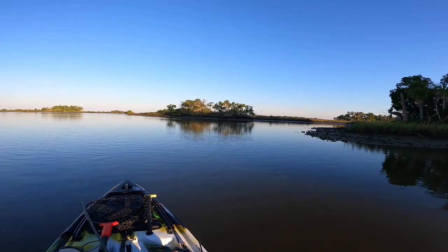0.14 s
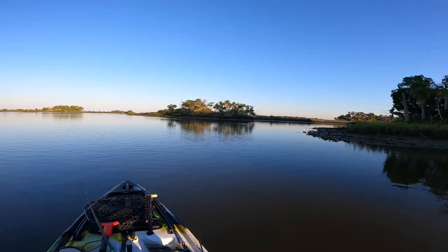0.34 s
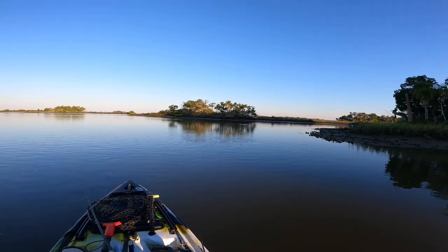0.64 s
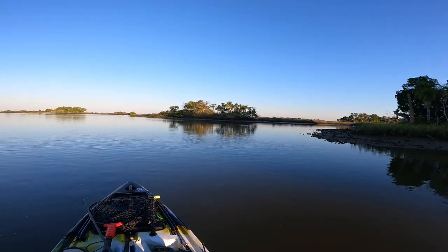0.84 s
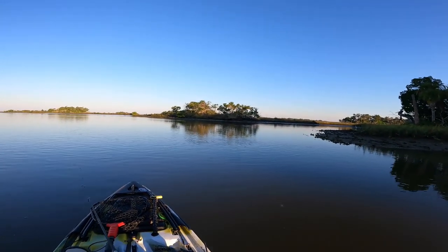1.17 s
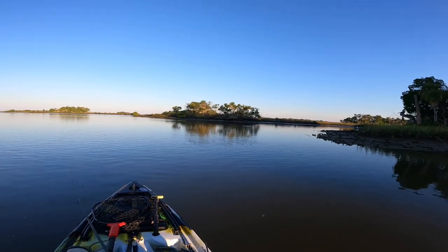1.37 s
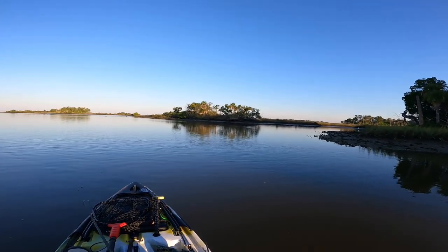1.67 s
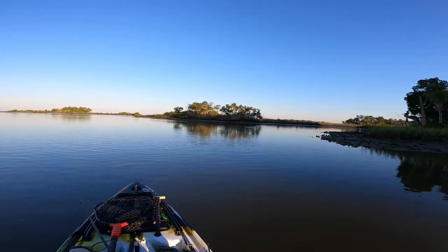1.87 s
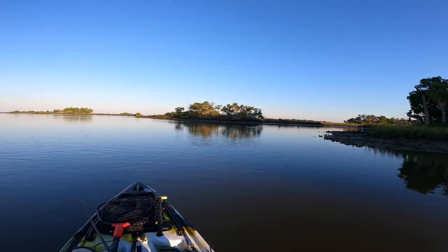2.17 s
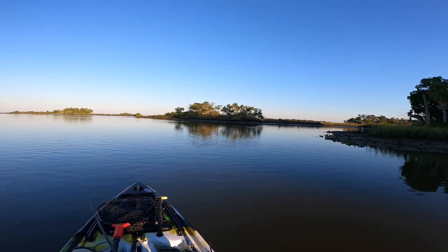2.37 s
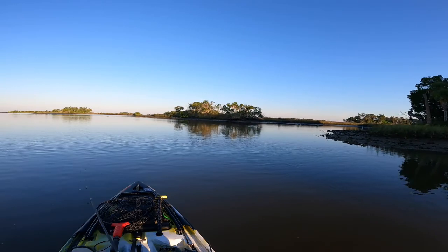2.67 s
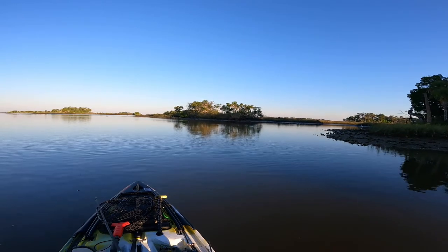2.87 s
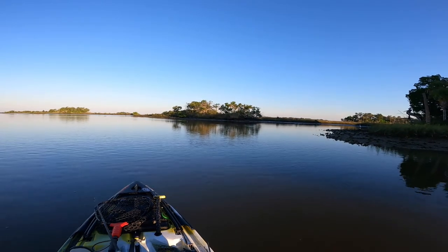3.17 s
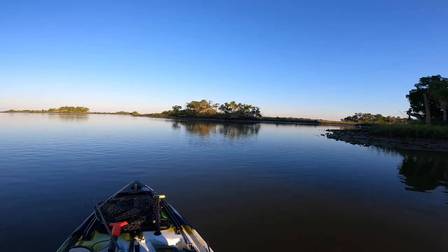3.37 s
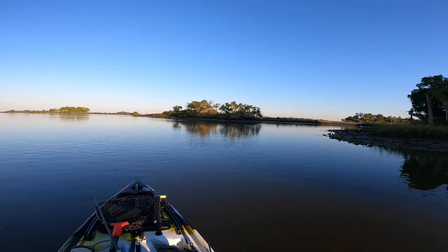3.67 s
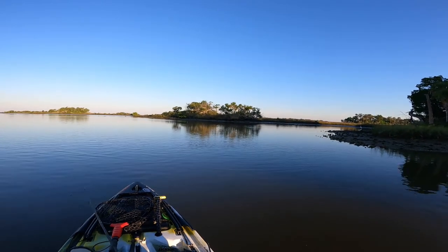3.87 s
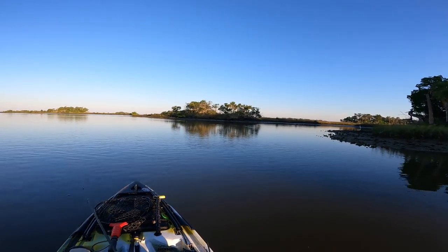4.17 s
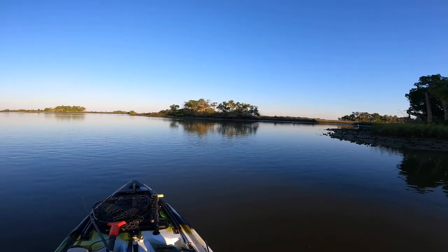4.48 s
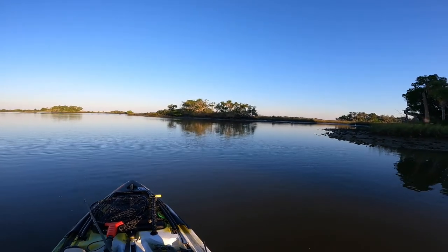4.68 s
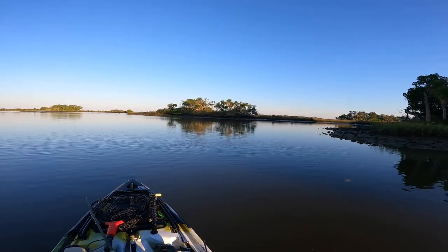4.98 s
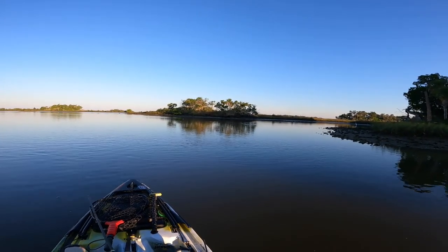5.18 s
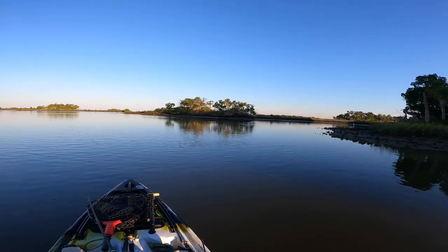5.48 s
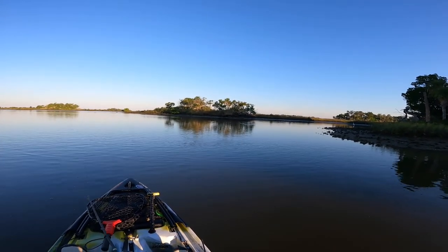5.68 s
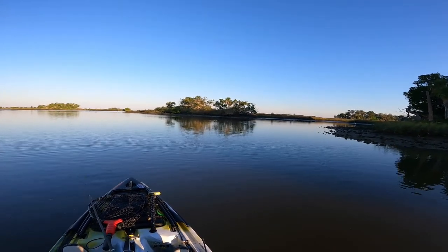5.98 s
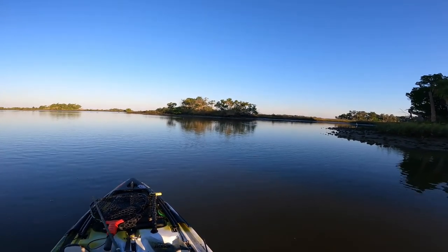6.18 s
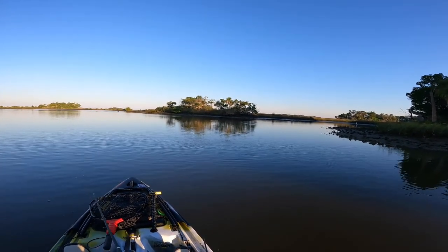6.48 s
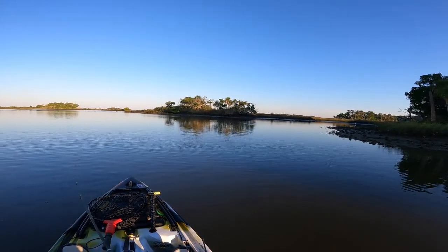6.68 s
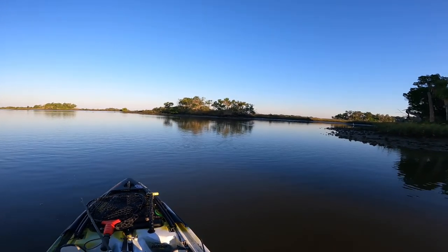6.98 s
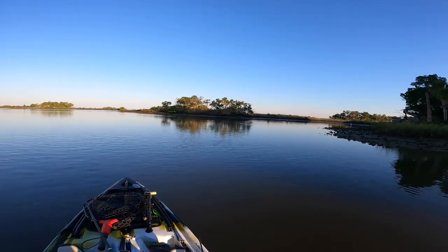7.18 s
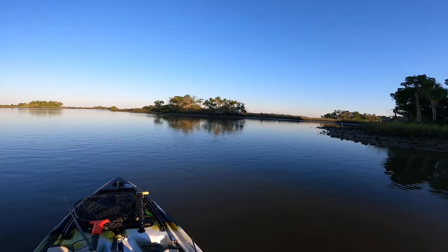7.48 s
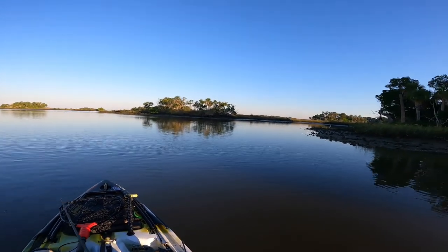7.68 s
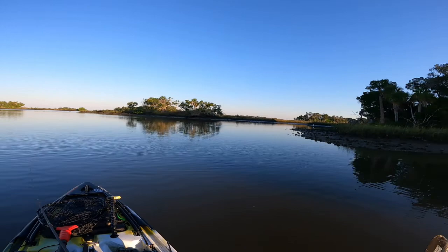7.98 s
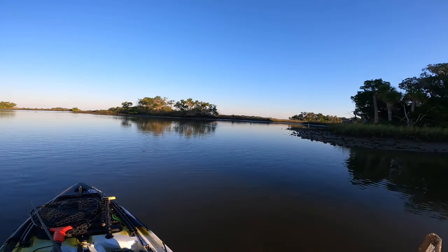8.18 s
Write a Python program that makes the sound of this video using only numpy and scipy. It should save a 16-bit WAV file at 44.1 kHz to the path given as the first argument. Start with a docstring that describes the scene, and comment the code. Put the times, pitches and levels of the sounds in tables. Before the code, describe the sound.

From 0 to about 8.3 seconds a distant airboat runs at nearly constant throttle: a strong low hum around 150 hertz, deep propeller thud and soft chopped roar beneath it, beating about once a second. Its overtones, growl and faint buzzing rasp swell and sink as if carried by moving air; one higher engine note sings out briefly around 4.5 seconds. Over it, very quietly, far insects make a narrow flickering trill near 4.4 kilohertz, slightly right, and thin high ticks recur roughly every 0.3 seconds in faint grainy hiss. At 0.56 a small, dry, hard tap sounds close by. From 2.75 to 4.05 a quick raspy rattle of sixteen strokes comes from the shore, growing duller midway and weaker later; a single drop plinks at 3.0. Afterwards only drone and insects continue, without the boat arriving or leaving. Open, calm, wide stereo, most different between sides in the treble.

```python
"""A distant airboat cruises at steady throttle, heard by a pair of microphones in a kayak on calm marsh water.
Its exhaust orders and blade tones are sines driven by one crankshaft, beating slowly against each other over
a roar of shaped noise; moving air fades the overtones in and out.
On the shore insects trill (narrow noise) and tick (a short high sine) in a faint hiss (noise); something small
gives one dry rattle (noise strokes), a hard thing is tapped (decaying sines) and a drop lands (a short sine)."""
import sys
import numpy as np
from scipy import signal
from scipy.fft import rfft, irfft
from scipy.io import wavfile
from scipy.ndimage import uniform_filter1d

SR = 44100
rng = np.random.default_rng(int(sys.argv[2]) if len(sys.argv) > 2 else 0)


def generate_wav(sig):
    """Save sig (samples, or channels by samples) to the path in sys.argv[1] as 16-bit PCM at SR."""
    pcm = np.round(np.clip(np.atleast_2d(sig).T, -1, 1) * 32767).astype(np.int16)
    wavfile.write(sys.argv[1], SR, pcm)


N = 367794
STEP = 6
T = np.arange(N) / SR
T_LOW = np.arange(N // STEP + 1) * STEP / SR  # a coarser clock is enough for the engine lines


def amp(db):
    """Decibels to gain."""
    return 10 ** (np.asarray(db) / 20)


def unit(x):
    """Scales to rms 1."""
    return x / np.sqrt(np.mean(abs(x) ** 2) + 1e-30)


def at_hz(points, hz):
    """Reads a spectrum on a log-frequency axis."""
    f, value = np.transpose(points)
    return np.interp(np.log(hz + 1), np.log(f), value)


def at_time(rows, t):
    """Reads a curve of (t/s, value) rows."""
    return np.interp(t, *np.transpose(rows))


def drift(size, rate, clock):
    """Slow complex chance of rms 1 that changes about rate times a second."""
    points = 1024
    hz = np.fft.fftfreq(points, clock[-1] / (points - 1))
    white = rng.standard_normal(points) + 1j * rng.standard_normal(points)
    slow = np.fft.ifft(np.fft.fft(white) / (1 + (hz / rate) ** 2))
    return np.interp(np.linspace(0, points - 1, size), np.arange(points), unit(slow))


# how much the two microphones differ: f/Hz, side level/dB re mid
MICROPHONES_APART = [(25, -21), (70, -37), (150, -35.5), (300, -28.5), (700, -16.5), (1400, -11.5),
                     (2800, -3.5), (4400, -7), (9000, -3.5), (14000, -14.5)]


def pair(common, apart):
    """Two microphones: they share the bass and differ more in the treble."""
    side_gain = amp(at_hz(MICROPHONES_APART, np.fft.rfftfreq(N, 1 / SR)))
    side = irfft(rfft(apart) * side_gain, N)
    return np.array([common + side, common - side])


def noise(colour):
    """Stereo noise with the given spectrum, mid and side source each of rms 1; steep fall above the last point."""
    hz = np.fft.rfftfreq(N, 1 / SR)
    shape = amp(at_hz(colour, hz)) / np.maximum(hz / colour[-1][0], 1) ** 4
    common, apart = unit(irfft(rfft(rng.standard_normal((2, N))) * shape, N))
    return pair(common, apart)


def far_line(turns, hz, steady_hz=800, flutter_hz=0.73, scatter=0.45, scatter_hz=7):
    """One partial after a long path: the higher it is, the more the air makes it twinkle."""
    loose = hz ** 2 / (hz ** 2 + steady_hz ** 2)  # share of the power that fades
    slow = drift(len(turns), flutter_hz, T_LOW)
    quick = drift(len(turns), scatter_hz, T_LOW)
    fading = unit(slow + scatter * quick)
    carried = unit(np.sqrt(1 - loose) + np.sqrt(loose) * fading)
    return np.sqrt(2) * (carried * np.exp(2j * np.pi * (turns + rng.random()))).real


# engine speed of the far boat: t/s, crankshaft turns per second
CRANK_SPEED = [(0.0, 59.37), (1.2, 59.29), (2.4, 59.1), (3.6, 59.0), (4.4, 59.01), (5.5, 59.17),
               (7.0, 59.23), (8.34, 59.25)]
# three blades behind a reduction gear: blade passes per crankshaft turn
BLADES_PER_TURN = 3 / 2.3808
# a moment when exhaust and propeller push together (s)
IN_STEP_S = 4.89
# firing note, before its waver: t/s, level/dB
FIRING_LEVEL = [(0, -27.5), (0.5, -33), (0.8, -29), (2.4, -27.5), (3.55, -29), (4.8, -26), (5.5, -27.5),
                (8.34, -27)]
# unequal cylinders fill in the orders of the four-stroke cycle: order, level/dB re EXHAUST_DB
EXHAUST_ORDERS = [(1, -37), (2, -22), (3, -12.5), (4, -24.5), (5, 0), (6, -23), (7, -22.5), (8, -15),
                  (9, -20), (10, -27), (11, -26), (12, -33), (13, -23.5), (14, -40.5), (15, -39),
                  (16, -23.5), (17, -39), (18, -40.5), (19, -33), (20, -34), (21, -34), (22, -34),
                  (23, -38), (24, -43.5), (25, -49.5), (26, -47), (27, -33.5), (28, -40), (29, -38.5)]
EXHAUST_DB, FIRING_ORDER = -30.5, 5
# one exhaust order sings out for a moment, then sinks: t/s, added level/dB
SINGING_RISE = [(3.6, 3.5), (4.45, 12.5), (5.2, 6)]
SINGING_ORDER = 11
# higher exhaust orders, a buzzing rasp: f/Hz, typical level/dB of each line
RASP_LINES = [(880, -74), (1080, -82.5), (1300, -76), (1550, -81), (1900, -83.5), (2150, -90), (2500, -96)]
# propeller tones: multiple of the blade rate, level/dB
BLADE_TONES = [(1, -36.5), (2, -39.5), (3, -51), (4, -61.5), (5, -53.5), (6, -67.5), (7, -70), (8, -65),
               (9, -65.5), (10, -71.5)]
# colour of the turbulent propeller wash: f/Hz, relative level/dB per Hz
ROAR_COLOUR = [(12, -23.5), (30, -13), (60, -2.5), (90, 1.5), (160, -1), (190, -5.5), (300, -9),
               (400, -8.5), (520, -16), (800, -19.5), (1050, -26.5), (1450, -28.5), (2000, -33.5),
               (2500, -48.5), (3400, -63)]
ROAR_DB = -42.5


def airboat(uneven_db=2.0, chop=.3, shimmer=0.049, waver_db=1.08, waver_hz=2.6):
    """Exhaust orders, blade tones and chopped roar, all driven by one crankshaft."""
    crank_hz = at_time(CRANK_SPEED, T_LOW)
    crank = np.cumsum(crank_hz) * STEP / SR
    crank = crank - np.interp(IN_STEP_S, T_LOW, crank)
    cycle, cycle_hz = crank / 2, crank_hz.mean() / 2  # a four-stroke cycle takes two turns
    blade, blade_hz = crank * BLADES_PER_TURN, crank_hz.mean() * BLADES_PER_TURN

    # the firing note and the second blade tone lie about 1 Hz apart: a slow throb
    firing_db = at_time(FIRING_LEVEL, T_LOW) + waver_db * drift(len(T_LOW), waver_hz, T_LOW).real
    hum = amp(firing_db) * np.cos(2 * np.pi * FIRING_ORDER * cycle)
    for k, db in BLADE_TONES[:2]:
        hum = hum + amp(db) * np.cos(2 * np.pi * round(k) * blade)
    hum = np.sqrt(2) * hum * (1 + shimmer * drift(len(hum), 5.0, T_LOW).real)

    # the other lines: phase in turns, mean frequency, level
    lines = []
    singing_db = at_time(SINGING_RISE, T_LOW)
    for k, db in EXHAUST_ORDERS:
        order = round(k)
        if order != FIRING_ORDER:
            line_db = EXHAUST_DB + db + singing_db * (order == SINGING_ORDER)
            lines.append((order * cycle, k * cycle_hz, line_db))
    for k in range(30, 84):
        line_db = at_hz(RASP_LINES, k * cycle_hz) + uneven_db * rng.standard_normal()
        lines.append((k * cycle, k * cycle_hz, line_db))
    for k, db in BLADE_TONES[2:]:
        lines.append((round(k) * blade, k * blade_hz, db))

    # two independently fading sums: one common to both microphones, one that sets them apart
    direct = sum(amp(db) * far_line(turns, hz) for turns, hz, db in lines)
    shore = sum(amp(db) * far_line(turns, hz) for turns, hz, db in lines)
    coarse = [hum + direct, shore]
    fine = signal.resample_poly(coarse, STEP, 1, axis=1, window=("kaiser", 11), padtype="antireflect")
    tones = pair(*fine[:, :N])

    # each passing blade chops the wash
    chopping = unit(1 + chop * np.cos(2 * np.pi * np.interp(T, T_LOW, blade)))
    return tones + amp(ROAR_DB) * noise(ROAR_COLOUR) * chopping


# swell of each register over the water, from low to high: t/s, level/dB (only its change about the mean counts)
THUD_SWELL = [(0.15, -36), (0.96, -33), (4.9, -37.5), (8.2, -35)]
DRONE_SWELL = [(0.1, -47.5), (1.38, -38), (3.26, -38), (5.63, -46), (7.63, -41), (8.2, -41)]
GROWL_SWELL = [(0.1, -52), (0.85, -52), (2.38, -57), (2.75, -52), (3.89, -47), (5.03, -55), (5.99, -48),
               (8.09, -54), (8.3, -54.5)]
SNARL_SWELL = [(0.1, -64), (0.62, -59.5), (1.77, -67), (3.19, -58), (3.89, -64), (4.21, -56.5), (5.4, -53),
               (6.94, -58), (8.2, -55.5)]
TREBLE_SWELL = [(0.1, -58.5), (1.55, -64.5), (3.82, -60.5), (5.07, -59.5), (8.25, -64)]
# where one register gives way to the next: f/Hz; the firing note lies between the first two
REGISTER_EDGES_HZ = [115, 185, 430, 660, 1220]
# two sound paths cancel in one narrow, wandering notch: t/s, f/Hz, level/dB
PATH_NOTCH = [(0.2, 420, -4.5), (1.399, 385, -13), (2.598, 406, -2.5), (4.0, 440, -1.5), (4.801, 460, -8.5),
              (5.7, 428, 0), (7.499, 317, -2.5)]


def air_path(x, depth=1.0, blend_octaves=0.17, notch_octaves=.24, patchy_db=2.0):
    """The thud and the overtones swell and sink as the air shifts; the firing note's register keeps its level."""
    hz, t, z = signal.stft(x, SR, nperseg=4096, noverlap=3072, boundary="odd")
    hz = hz[:, None]
    swells = []
    for curve in (THUD_SWELL, DRONE_SWELL, GROWL_SWELL, SNARL_SWELL, TREBLE_SWELL):
        db = at_time(curve, t)
        swells.append(db - 10 * np.log10(np.mean(amp(db) ** 2)))  # mean power gain 1
    thud, *overtones = swells
    fade_db = thud
    for edge_hz, level in zip(REGISTER_EDGES_HZ, [0, *overtones]):
        above = (1 + np.tanh(np.log2((hz + 1) / edge_hz) / blend_octaves)) / 2
        fade_db = (1 - above) * fade_db + above * level

    s, centre_hz, depth_db = np.transpose(PATH_NOTCH)
    octaves_off = np.log2((hz + 1) / np.interp(t, s, centre_hz))
    notch = np.interp(t, s, depth_db) * np.exp(-(octaves_off / notch_octaves) ** 2)

    # eddies light up patches of the short waves
    patches = uniform_filter1d(rng.standard_normal(fade_db.shape), size=18, axis=0)
    patches = uniform_filter1d(patches, size=20, axis=1)
    short_waves = np.clip((hz - 400) / 1000, 0, 1)
    fade_db = depth * fade_db + notch + patchy_db * unit(patches) * short_waves
    return signal.istft(z * amp(fade_db), SR, nperseg=4096, noverlap=3072)[1][:, :N]


# colour of the far insects: f/Hz, relative level/dB per Hz
CHORUS_COLOUR = [(3400, -38.5), (3850, -15), (4100, -6), (4280, 3), (4450, 2), (4650, -2.5), (4900, -11.5),
                 (5400, -26.5), (6500, -38.5)]
CHORUS_DB = -67


def chorus(right_db=1.25, flicker_db=-1.0):
    """Many far insects merge into one narrow flickering trill, a little to the right."""
    flicker = amp(flicker_db * drift(N, 12, T).real)
    return amp(CHORUS_DB) * noise(CHORUS_COLOUR) * flicker * amp([[-right_db], [right_db]])


# colour of the faint high hiss of the marsh: f/Hz, relative level/dB per Hz
HISS_COLOUR = [(1500, 0), (2700, 4), (3500, -1.5), (5400, 3), (6200, -3), (7000, -5), (7800, -6.5),
               (8100, -12.5), (9500, -16), (12000, -18.5), (15000, -28.5)]


def hiss(rest_db=-77.5, swell_db=-73.5, follow=0.84, lead_s=0.035, width_s=0.051, grain_db=3.0, still_db=-95):
    """A faint, grainy high hiss over an even floor; it swells just ahead of each tick, more for a strong one."""
    grain = unit(amp(grain_db * drift(N, 30, T).real))
    floor = amp(still_db) * noise([(3000, 0.0), (9000, 1.5), (15000, -6.0)])
    usual_db = np.mean(INSECT_TICKS, 0)[1]
    power = amp(rest_db) ** 2
    for s, db in INSECT_TICKS:
        swell = np.exp(-((T - s + lead_s) / width_s) ** 2)
        power = power + amp(swell_db + follow * (db - usual_db)) ** 2 * swell
    return np.sqrt(power) * noise(HISS_COLOUR) * grain + floor


# thin insect ticks on the shore: t/s, level/dB before the common gain
INSECT_TICKS = [(0.144, -71.5), (0.423, -73.5), (0.6767, -70), (1.2346, -69.5), (1.5224, -75),
                (1.8143, -73), (2.085, -72.5), (2.3715, -70), (2.655, -75.5), (2.9018, -67),
                (3.2115, -70.5), (3.4735, -68), (4.304, -71), (4.6196, -68), (4.932, -71.5),
                (5.1801, -67.5), (5.474, -72.5), (5.7493, -71.5), (5.936, -70), (6.047, -69), (6.2961, -66),
                (6.552, -67), (7.1376, -68.5), (7.3841, -65.5), (7.6827, -73), (7.964, -71.5),
                (8.2147, -70)]


def ticks(level_db=4.5, ring_hz=8950, spread=.012, phase_radians=1.0, scatter_db=-24, scatter_s=.012):
    """Each snap swells and dies in one high mode within a few milliseconds; the reeds scatter it."""
    out, t = np.zeros((2, N)), np.arange(2400) / SR
    age = t / .0007  # the snap peaks after 0.7 ms
    envelope = (age * np.exp(1 - age)) ** 2
    scatter = noise([(7500, -30.0), (8500, 0.0), (9300, 0.0), (10200, -25)])
    for s, db in INSECT_TICKS:
        detune, lead = rng.standard_normal(2)
        # the two microphones hear the ring at different phases
        offset = phase_radians * lead * np.array([[.5], [-.5]])
        ring = np.sin(2 * np.pi * ring_hz * (1 + spread * detune) * t + offset)
        start = round(s * SR)
        at = slice(start, start + len(t))
        trail = amp(scatter_db) * scatter[:, at] * np.exp(-t / scatter_s)
        out[:, at] += amp(db + level_db) * (envelope * ring + trail)
    return out


# modes of one small dry tap close by: f/Hz, level/dB re TAP_DB, 60 dB decay t/s
TAP_MODES = [(3160, -9, .025), (3700, 0, 0.032), (4700, -10.5, .012), (5600, -4, 0.017)]
TAP_S, TAP_DB = .561, -59


def tap():
    """Something small and hard is touched once and its modes ring briefly."""
    t = np.maximum(T - TAP_S, 0)
    out = 0
    for hz, db, t60 in TAP_MODES:
        decay_db = np.minimum(60 * t / t60, 200)
        out = out + amp(TAP_DB + db - decay_db) * np.sin(2 * np.pi * hz * t)
    return out


# strokes of the dry rattle on the shore: t/s, level/dB before the common gain
RATTLE_STROKES = [(2.7634, -59.5), (2.8654, -61), (2.9627, -61), (3.0415, -59), (3.134, -56.5),
                  (3.218, -58), (3.3034, -58.5), (3.3904, -58.5), (3.476, -59.5), (3.554, -62),
                  (3.641, -61.5), (3.714, -62.5), (3.7974, -64.5), (3.8806, -61.5), (3.9529, -61),
                  (4.042, -62.5)]
# colour of its rasp: f/Hz, relative level/dB per Hz
RASP_COLOUR = [(2000, -7.5), (2900, -1.5), (3800, -8), (5200, 2.5), (6000, -2), (6800, 1.5), (7300, -5.5),
               (8200, -17), (9000, -24), (13000, -45.5)]
# how long the shore holds on to each stroke (s)
RATTLE_TRAIL_S = .05


def rattle(level_db=-7.5, width_s=.012, echo=0.61, bright_db=4.5, dull_db=-0.5, dulls_at_s=3.35,
           dulling_s=.12, grain_db=2):
    """A quick run of raspy strokes that turns duller midway, each trailed by its scatter from the shore."""
    power = np.zeros(N)
    for s, db in RATTLE_STROKES:
        stroke = np.exp(-((T - s) / width_s) ** 2)
        fall_s = np.where(T > s, RATTLE_TRAIL_S, 2 * width_s)
        trail = echo ** 2 * np.exp(-abs(T - s) / fall_s)
        power += amp(db + level_db) ** 2 * (stroke + trail)
    rasp = noise(RASP_COLOUR) * unit(amp(grain_db * drift(N, 50, T).real))
    high_pass = signal.butter(4, 7400, "high", fs=SR, output="sos")
    top = signal.sosfiltfilt(high_pass, rasp)
    top_db = np.interp(T, [dulls_at_s - dulling_s, dulls_at_s + dulling_s], [bright_db, dull_db])
    return np.sqrt(power) * (rasp + top * (amp(top_db) - 1))


# one drop on the water (s)
DRIP_S = 2.988


def drip(hz=1780, level_db=-53, rise_s=0.0046):
    """One drop lands on the water: a short bubble note."""
    t = np.maximum(T - DRIP_S, 0)
    envelope = (t / rise_s * np.exp(1 - t / rise_s)) ** 2
    return amp(level_db) * envelope * np.sin(2 * np.pi * hz * t)


def scene():
    """The far boat over the small sounds of the shore."""
    return air_path(airboat()) + chorus() + hiss() + ticks() + tap() + rattle() + drip()


def record(dry):
    """The recorder's band limit, with soft ends."""
    low_pass = signal.butter(16, 15600, fs=SR, output="sos")
    ends = signal.windows.tukey(N, 300 / N)
    return signal.sosfiltfilt(low_pass, dry * ends, axis=1)


dry = scene()
out = record(dry)
generate_wav(out)
```